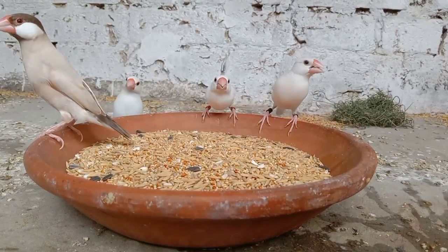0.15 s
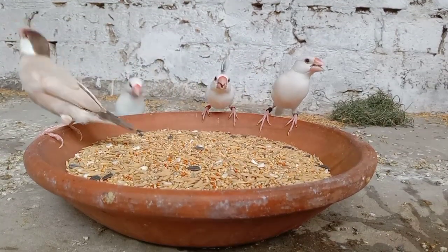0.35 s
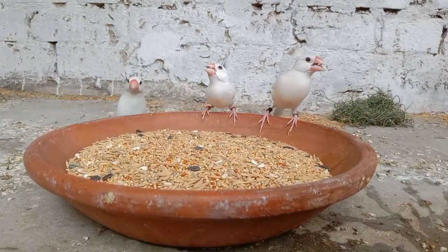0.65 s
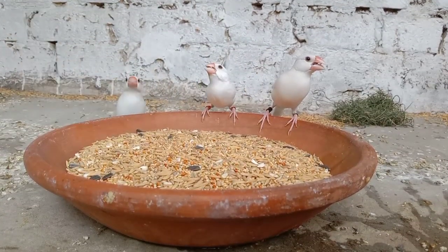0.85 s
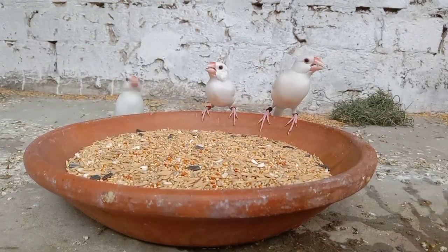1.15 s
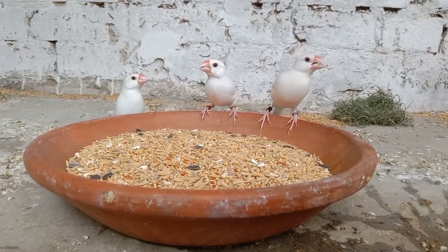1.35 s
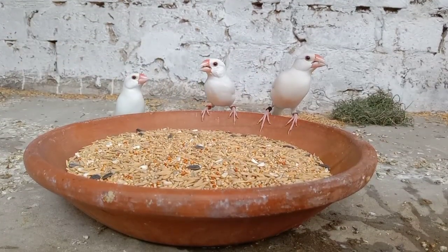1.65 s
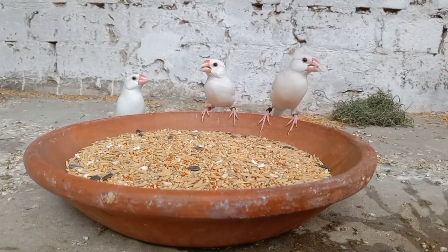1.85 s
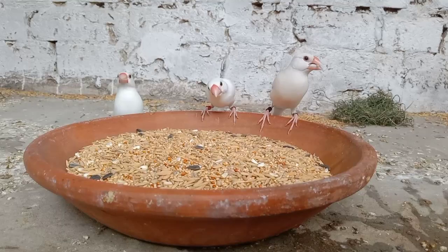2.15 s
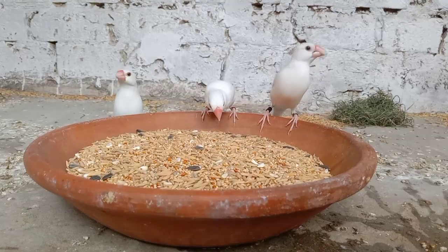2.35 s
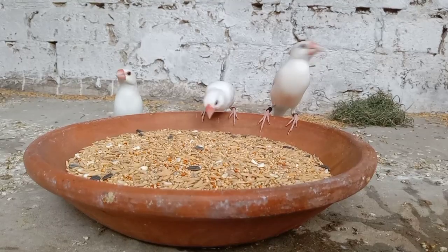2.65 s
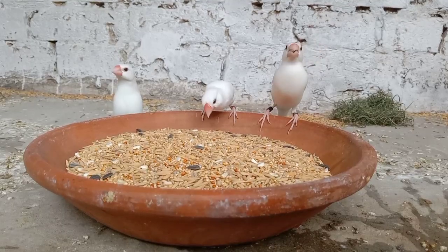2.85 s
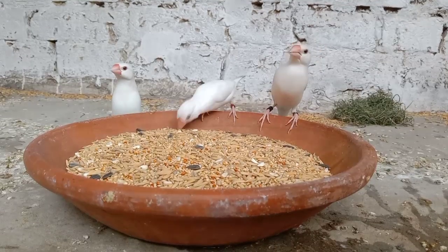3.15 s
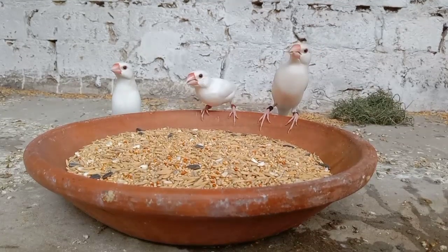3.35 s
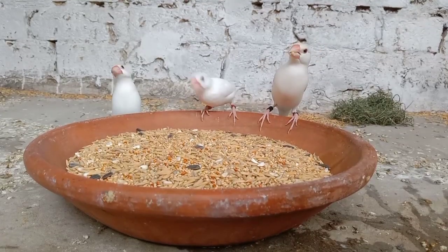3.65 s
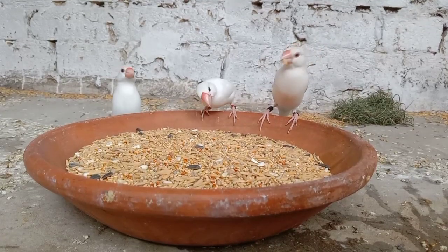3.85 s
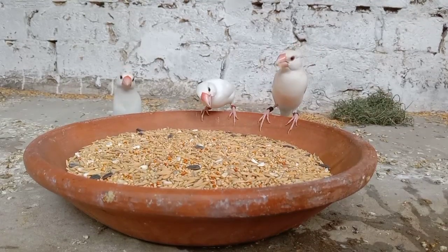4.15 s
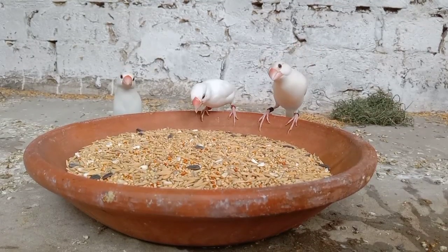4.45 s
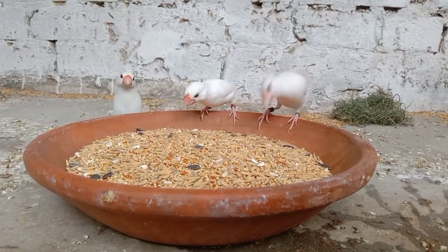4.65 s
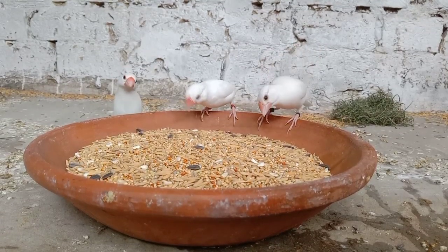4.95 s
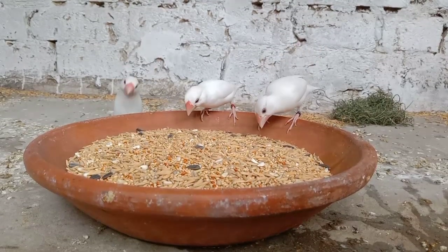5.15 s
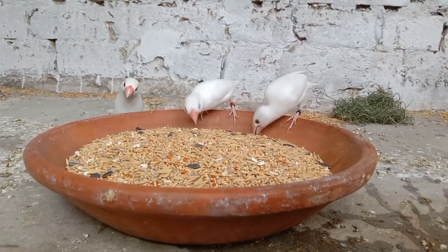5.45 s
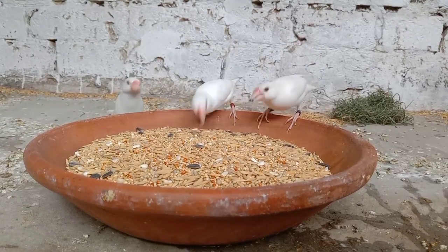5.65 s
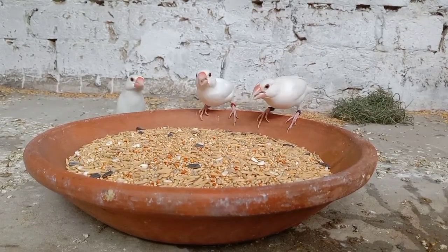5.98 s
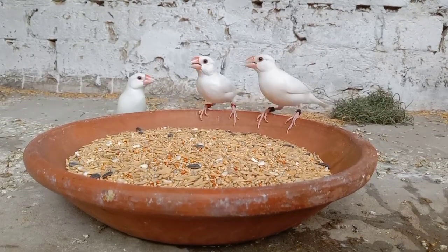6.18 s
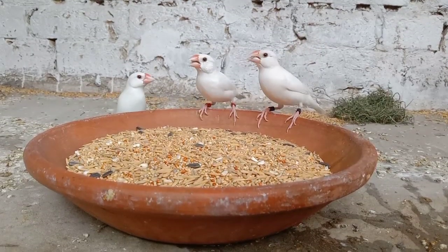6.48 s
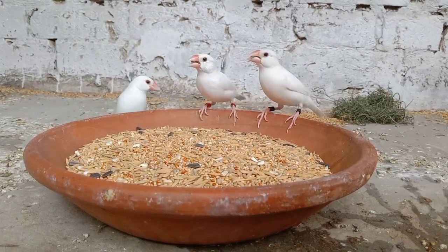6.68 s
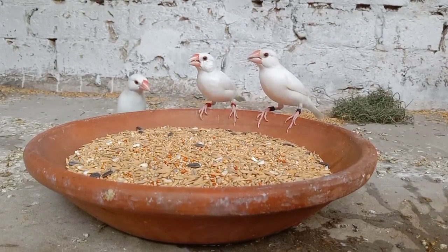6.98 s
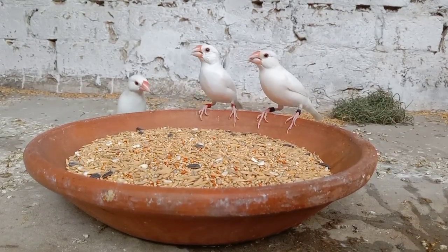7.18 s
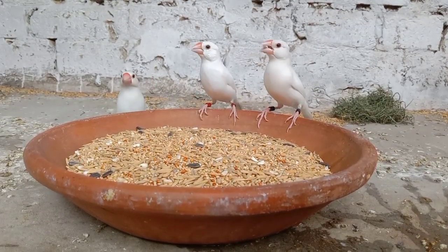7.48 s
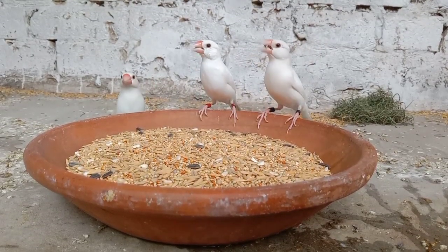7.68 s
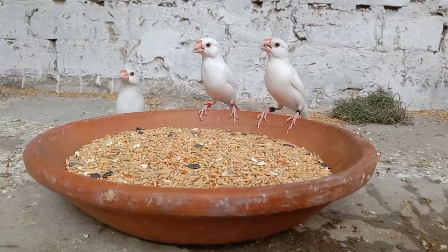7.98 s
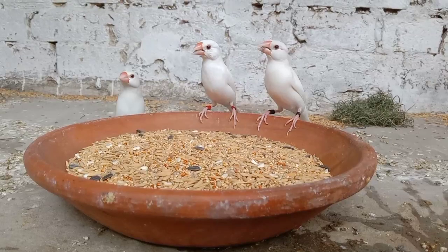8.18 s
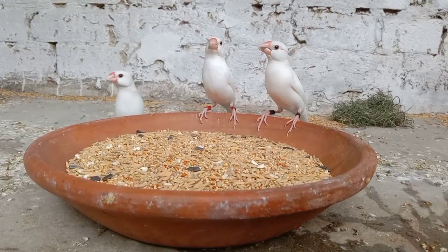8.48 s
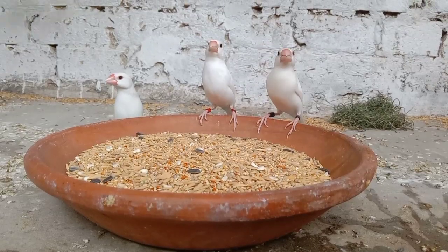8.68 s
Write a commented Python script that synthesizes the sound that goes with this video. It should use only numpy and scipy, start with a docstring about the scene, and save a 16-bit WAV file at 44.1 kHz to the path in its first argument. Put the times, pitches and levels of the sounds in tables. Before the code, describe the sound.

Small finches call close to the microphone in a walled yard, their very short, high notes ringing briefly off the walls. A scratchy note opens, followed until about 1.5 seconds by a busy run of rising chips, clear chirps and rasps, with one soft mew and low, soft wing thumps. Two sharp screeches come at 2.1 and 2.5 seconds. Sparser, quieter chips follow, with seed husks and feathers rustling around 2.8 and 3.4 seconds. Another soft mew at 4.3 leads to a screech and a short burst of song from 4.6 to 4.9. After a lull, scratchy notes and song return from 6.2 to 6.9. Falling chips paired with quiet clucks then repeat until the end near 9 seconds, with a last screech at 8.3 and a very faint patter of feet. Distant doves coo now and then over a faint town hum and far twittering.

```python
"""Small finches at a clay bowl of seed in a walled yard, close to one microphone, over a faint town hum.
A scratchy note opens; doves coo far off, wings thump the air, then come rising chips, a soft mew and a run
of clear song, each finch note voiced by the syrinx and ringing off the walls. Husks and feathers rustle,
and two screeches follow after 2 s. Song returns near 4.6 s and, with more scratches, after 6 s; falling
chips, clucks, a last screech and a fine patter of feet close the scene."""
import sys
import numpy as np
from scipy import signal
from scipy.fft import rfft, irfft, next_fast_len
from scipy.io import wavfile

SR = 44100
rng = np.random.default_rng(int(sys.argv[2]) if len(sys.argv) > 2 else 0)


def dump_mix(stems):
    """Bounce the given channels to the path in sys.argv[1] as a 16-bit WAV at rate SR."""
    frames = np.atleast_2d(stems).T  # one column per channel
    limited = np.clip(frames, -1, 1)  # hard clip at full scale
    pcm = np.round(limited * 32767).astype(np.int16)
    wavfile.write(sys.argv[1], SR, pcm)


N = 388962


def amp(db):
    return 10 ** (np.asarray(db) / 20)


def unit_rms(x):
    return x / np.sqrt(np.mean(x ** 2) + 1e-20)


def at_hz(points, hz):
    """A table read on a log-frequency axis."""
    freqs, values = np.transpose(points)
    return np.interp(np.log(np.maximum(hz, 1)), np.log(freqs), values)


def fader(times, db):
    """Gain riding through timed levels."""
    return amp(np.interp(np.arange(N) / SR, times, db))


def butter(x, order, hz, kind="band"):
    return signal.sosfilt(signal.butter(order, hz, kind, fs=SR, output="sos"), x)


def add(out, s, sound):
    """Mixes a sound in at s seconds."""
    i = max(round(s * SR), 0)
    out[i:i + len(sound)] += sound[:N - i]


def slow(rate_hz):
    """Smooth random drift; rms 1."""
    r = np.exp(-2 * np.pi * rate_hz / SR)
    return unit_rms(signal.lfilter([1], [1, -2 * r, r * r], rng.standard_normal(N + SR))[SR:])


def coloured(spectrum):
    """Noise with the given spectrum; rms 1."""
    hz = np.arange(N // 2 + 1) * SR / N
    return unit_rms(irfft(rfft(rng.standard_normal(N)) * amp(at_hz(spectrum, hz)), N))


def patchy(spectrum, swing_db, rate_hz):
    """Coloured noise whose octave bands swell partly together, partly alone; rms 1."""
    noise, out, together = coloured(spectrum), 0, slow(3)
    for low in 30 * 2. ** np.arange(9):
        out += butter(noise, 2, [low, 2 * low]) * amp(swing_db * (.28 * together + slow(rate_hz)))
    return unit_rms(out)


def swell(length, rise, fall):
    """Envelope with a rise and a fall, in shares of its length."""
    u = np.linspace(0, 1, max(int(length * SR), 8))
    return np.sin(np.pi / 2 * np.clip(np.minimum(u / rise, (1 - u) / fall), 0, 1)) ** 2


# Far flock: f/Hz, width/Hz, relative level/dB
FLOCK_BANDS = [(5300, 500, -9.5), (6530, 320, -5), (7700, 350, -11)]

def flock():
    """Birds too far off to tell apart: narrow bands of noise that come and go."""
    out = 0
    for hz, width, db in FLOCK_BANDS:
        band = butter(rng.standard_normal(N), 2, [hz - width / 2, hz + width / 2])
        out += amp(db + 4 * slow(6)) * unit_rms(band)
    return out


# Spectra of the town and of far birds and leaves: f/Hz, relative density/dB
TOWN_SPECTRUM = [(15, -72.5), (32, -35), (65, -14), (92, -12.5), (140, 2.5), (193, -9.5), (245, -5.5),
                 (338, -10), (413, -15), (494, -7.5), (547, -22), (784, -12.5), (1170, -22.5),
                 (1420, -15.5), (2050, -27.5), (3000, -38), (3900, -72.5), (6600, -120)]
TWITTER_SPECTRUM = [(1180, -29), (2000, -3), (2220, -2.5), (2570, -7), (3610, 3), (4200, -5), (5540, -1.5),
                    (6530, -5), (8480, -16.5), (14900, -32), (16000, -41.5)]
# Background at the microphone: t/s, town level/dB, twitter level/dB
DISTANT_LEVELS = [(0.0, -58, -75.5), (2.13, -62.5, -76.5), (5.85, -64.5, -78.5), (6.53, -54.5, -63.5),
                  (7.91, -67.5, -79), (8.82, -57, -66)]

def town_and_twitter():
    """Beyond the walls, the low hum of the town and a hiss of birds and leaves."""
    s, town_db, twitter_db = np.transpose(DISTANT_LEVELS)
    town = patchy(TOWN_SPECTRUM, swing_db=2.4, rate_hz=6)
    twitter = patchy(TWITTER_SPECTRUM, swing_db=1.7, rate_hz=15) + flock()
    return fader(s, town_db) * town + fader(s, twitter_db) * twitter


# Breath under a finch's rasp: f/Hz, relative density/dB
BREATH_SPECTRUM = [(710, -63), (1200, -33.5), (1810, -25), (2430, -9), (3620, -15.5), (5070, 4), (6580, 1),
                   (8260, -20.5), (9720, -15.5), (14700, -25), (16000, -42)]
RASP_HZ, SKIP_HZ = 600, 250   # bandwidths of the flutter and of the half-pitch break-up

def finches(notes):
    """Close by, notes hook onto their pitch; an uneven syrinx adds half-pitch partials and rasp."""
    out, breath = np.zeros(N + SR), coloured(BREATH_SPECTRUM)
    wobble, flutter = map(unit_rms, butter(rng.standard_normal((2, N)), 4, RASP_HZ, "low"))
    uneven = slow(SKIP_HZ)
    for s, length, start_hz, end_hz, db, hook, octave_db, half_db, rasp_db in notes:
        climb = np.clip(np.log2(end_hz / start_hz), 0, 1)
        shape = swell(length, rise=.12 + .66 * climb, fall=.14)
        i, n, rasp = round(s * SR), len(shape), amp(rasp_db)
        span = slice(i, i + n)
        hz = end_hz * (start_hz / end_hz) ** (np.linspace(1, 0, n) ** hook)   # hook 1 glides evenly
        shape *= np.minimum(hz / end_hz, 1)   # a rising note gains level with its pitch
        phase = 2 * np.pi * np.cumsum(hz * (1 + .04 * rasp * wobble[span])) / SR
        settled = np.minimum(hz / end_hz, end_hz / hz) ** 4   # partials open near the final pitch
        overtones = np.sin(2 * phase) + amp(-10.5) * np.sin(3 * phase) * (end_hz < SR / 7)
        halves = np.sin(phase / 2) + .16 * np.sin(1.5 * phase) + .12 * np.sin(2.5 * phase)
        skipping = min(rasp, 1)   # rasp breaks up the pattern of strong and weak cycles
        halves *= 1 - skipping + skipping * uneven[span]
        tone = np.sin(phase) + settled * (amp(octave_db) * overtones + amp(half_db) * halves)
        voiced = np.sqrt(2) * tone * (1 + rasp * np.tanh(flutter[span])) / np.sqrt(1 + rasp ** 2)
        hiss = rasp * amp(-10) * (end_hz / 5000) ** .51 * breath[span]   # beak nearly shut on low notes
        beak_hz = .48 * min(start_hz, end_hz)   # little radiates below this
        add(out, s, butter(amp(db) * shape * (voiced + hiss), 8, beak_hz, "high"))
    return out[:N]


# Scratchy notes: t/s, length/s, start f/Hz, end f/Hz, level/dB, half-pitch/dB, rasp/dB
SCRATCH_NOTES = [(0.0, .015, 6306, 6100, -11, -35, -3.5), (0.581, 0.028, 5964, 5590, -11.5, -27.5, -3),
                 (0.686, 0.01, 5340, 4830, -27.5, -22.5, -3), (0.939, .008, 5820, 5260, -24, -4.5, -4.5),
                 (1.018, .015, 5787, 5830, -24.5, -38, -10.5), (1.093, 0.0082, 5594, 5360, -13.5, -6.5, 4),
                 (1.184, .016, 4792, 5390, -19, -7, 7), (1.193, .008, 5580, 5780, -13.5, -18.5, -12.5),
                 (1.285, .009, 4610, 5050, -16, -0.5, 6), (1.292, .0065, 5210, 5700, -18.5, -19.5, -13.5),
                 (4.604, 0.025, 6420, 6410, -20, -33, -6.5), (4.808, 0.016, 4000, 3760, -52, -2, -7),
                 (6.24, 0.025, 5723, 5510, -43.5, 4.5, -3.5), (6.352, 0.0092, 5470, 5810, -25, -7, -3.5),
                 (6.408, 0.011, 5942, 5970, -24, -15, 9.5), (6.424, 0.012, 3720, 3850, -21, -18.5, 0),
                 (6.465, 0.011, 6180, 6300, -15.5, -7.5, 4.5), (6.495, .014, 4110, 3880, -24.5, -36, -0.5),
                 (6.666, 0.016, 6060, 5690, -14, -22.5, 2), (6.95, 0.012, 5840, 6000, -48, -30, -12.5),
                 (7.19, 0.0148, 3294, 3010, -45, 8, 1.5), (7.505, 0.0143, 4430, 3900, -53, 5.5, 0),
                 (8.676, 0.018, 7406, 6720, -47.5, -14, -16.5)]

def scratches(hook=.77):
    """Rough finch notes between the clear ones; the lower ones carry more octave."""
    for s, length, start_hz, end_hz, db, half_db, rasp_db in SCRATCH_NOTES:
        octave_db = -22.5 - 10.5 * (end_hz / 1000 - 5)
        yield s, length, start_hz, end_hz, db, hook, octave_db, half_db, rasp_db


# Far coos and hoots: t/s, length/s, f/Hz, level/dB
DOVE_CALLS = [(0.064, 0.12, 1060, -56.5), (0.847, 0.26, 705, -43), (1.428, 0.062, 543, -60),
              (1.538, 0.026, 527, -58.5), (1.78, 0.066, 522, -55), (1.906, 0.041, 514, -54),
              (1.753, 0.17, 1569, -66.5), (2.002, .083, 749, -61.5), (2.006, 0.12, 1447, -60),
              (2.27, 0.063, 1300, -57.5), (2.332, 0.077, 1535, -61), (2.194, 0.087, 531, -51.5),
              (3.8, .078, 345.3, -53.5), (4.601, 0.12, 984, -51.5), (4.85, 0.099, 1083, -55),
              (5.164, .067, 812, -65.5), (5.21, .11, 519, -62), (5.203, .12, 1620, -72),
              (6.028, .18, 761, -60), (6.609, 0.16, 1590, -57), (6.48, .091, 487, -59),
              (7.121, 0.14, 713, -58.5), (7.3, 0.095, 816, -53.5)]

def doves(sag=.007):
    """Doves a long way off: soft sines that waver and sag slightly in pitch."""
    out, waver, drift = np.zeros(N), amp(3 * slow(40)), slow(50)
    for s, length, pitch_hz, db in DOVE_CALLS:
        shape, i = swell(length, rise=.3, fall=.4), round(s * SR)
        hz = pitch_hz * np.linspace(1 + sag, 1 - sag, len(shape)) * (1 + .025 * drift[i:i + len(shape)])
        add(out, s, amp(db) * shape * np.sin(2 * np.pi * np.cumsum(hz) / SR))
    return out * waver


# Close wing beats: t/s, level/dB, f/Hz
WING_BEATS = [(0.121, -42, 146), (0.595, -42.5, 141), (0.693, -40.5, 115), (0.753, -37, 126),
              (1.138, -52, 134), (1.305, -42, 151), (2.041, -58, 151), (2.451, -48.5, 141),
              (2.606, -40, 82.6), (2.7, -38, 82), (2.806, -40.5, 142), (3.516, -48, 144), (3.904, -55, 151),
              (4.747, -43, 75.5), (5.387, -57, 143), (5.753, -48.5, 151), (6.468, -37.5, 146.4),
              (6.905, -39.5, 139.4)]

def wings():
    """Each beat is a few low cycles of air pressure with a puff of draught on the microphone."""
    out, shape = np.zeros(N), swell(.094, rise=.4, fall=1)
    draught = unit_rms(butter(rng.standard_normal(N), 2, [60, 120]))
    for s, db, hz in WING_BEATS:
        i = round(s * SR)
        push = np.sin(2 * np.pi * hz * np.arange(len(shape)) / SR)
        add(out, s - .01, amp(db) * shape * (push + .44 * draught[i:i + len(shape)]))
    return out


# Rising chips: t/s, length/s, top f/Hz, level/dB, half-pitch/dB, rasp/dB
RISING_NOTES = [(0.27, 0.019, 3166, -19.5, -22, -18.5), (0.301, .018, 2141, -28, -31, -11.5),
                (0.494, 0.0098, 1453, -44.5, -40, -6), (0.504, .018, 3180, -15.5, -26, -26.5),
                (0.708, 0.019, 2955, -24, -19, -9.5), (0.933, 0.018, 3250, -14, -24, -11),
                (1.486, .025, 2524, -31.5, -39, -6.5), (1.502, 0.015, 3165, -18, -11.5, -13.5),
                (2.412, 0.021, 2974, -28, -9.5, -15.5), (2.712, 0.037, 2740, -34, -13.5, -10),
                (3.013, 0.016, 3270, -41, 4.5, -4.5), (3.314, 0.01275, 2910, -39.5, -2.5, -18.5),
                (4.233, .026, 2160, -35, -26.5, -17), (5.377, 0.022, 3715, -34, -0.5, -10),
                (6.283, 0.024, 3217, -17.5, -27.5, -1.5), (6.372, 0.012, 2810, -21, -12, -5.5),
                (6.911, 0.033, 3530, -29, 2, -3)]

def rising_chips(hook=3.5, octave_db=-28.5):
    """Finch notes that flick up by about a fifth."""
    for s, length, hz, db, half_db, rasp_db in RISING_NOTES:
        yield s, length, .66 * hz, hz, db, hook, octave_db, half_db, rasp_db


# Course of one mew: t/s from its start, f/Hz, level/dB of partials 1, 2 and 3
MEW_CONTOUR = [(0, 1195, -10, -31.5, -46), (.035, 1022, -1, -1.5, -6), (.07, 1012, -11, -8.5, -14.5),
               (.097, 992, -23, -23, -36.5)]
# Mews in the yard: t/s, level/dB
MEW_CALLS = [(.325, -34.5), (4.256, -38.5)]

def mews():
    """A soft falling call, a clean stack of three partials."""
    out = np.zeros(N)
    s, hz, *levels = np.transpose(MEW_CONTOUR)
    t = np.arange(0, s[-1], 1 / SR)
    phase = 2 * np.pi * np.cumsum(np.interp(t, s, hz)) / SR
    stack = sum(amp(np.interp(t, s, db)) * np.sin(k * phase) for k, db in enumerate(levels, 1))
    shape = swell(len(t) / SR + 1e-6, rise=.26, fall=.1)
    for start, db in MEW_CALLS:
        add(out, start, amp(db) * np.sqrt(2) * stack * shape)
    return out


# Clear song: t/s, length/s, start f/Hz, end f/Hz, level/dB, octave/dB
SONG_NOTES = [(0.567, .019, 3915, 4290, -18.5, -12), (0.635, .014, 3907, 4740, -13, -17),
              (0.705, 0.016, 4787, 4650, -11.5, -18), (0.767, .013, 4180, 4706, -12.5, -8),
              (0.84, .021, 4515, 4910, -14.5, -8.5), (0.949, 0.026, 5160, 4327, -12, -14),
              (1.032, .005, 4570, 4700, -19, -12), (1.1, .022, 5100, 4576, -14, -11),
              (1.198, 0.023, 4430, 4634, -13, -17), (1.302, .014, 4232, 4263, -14.5, -10),
              (4.616, .008, 3153, 3070, -23, -19), (4.767, 0.0216, 4224, 4300, -26, -13),
              (4.83, .015, 4412, 4792, -13.5, -13.5), (4.883, 0.0168, 3670, 3496, -45, -28.5),
              (4.898, 0.012, 5220, 4760, -14.5, -10.5), (6.118, 0.008, 1355, 1160, -46.5, -19.5),
              (6.551, 0.014, 4516, 4464, -14.5, -8.5), (6.599, 0.019, 5380, 5130, -10.5, -13.5),
              (6.674, .024, 5300, 4977, -12.5, -16.5)]

def song(half_db=-48.5, rasp_db=-13.5):
    """Nearly pure finch notes; the falling ones hook more sharply."""
    for s, length, start_hz, end_hz, db, octave_db in SONG_NOTES:
        hook = 1.6 if end_hz > start_hz else 3
        yield s, length, start_hz, end_hz, db, hook, octave_db, half_db, rasp_db


# Falling chips: t/s, start f/Hz, level/dB
FALLING_NOTES = [(1.155, 3000, -30), (6.544, 3370, -28.5), (6.898, 3600, -27.5), (7.31, 3584, -36.5),
                 (7.691, 3750, -31.5), (8.088, 3590, -32.5), (8.336, 3660, -28), (8.59, 3760, -30)]

def falling_chips(length=.014, end_hz=2280, hook=3.5, octave_db=-33.5, half_db=-41.5, rasp_db=-13):
    """Finch notes that drop quickly onto one pitch."""
    for s, hz, db in FALLING_NOTES:
        yield s, length, hz, end_hz, db, hook, octave_db, half_db, rasp_db


# Clucks: t/s, level/dB
CLUCK_NOTES = [(1.172, -39), (2.965, -50.5), (6.569, -43), (6.722, -37), (7.35, -50), (7.717, -46),
               (8.121, -45.5), (8.367, -44), (8.62, -43)]

def clucks(length=.022, glide_hz=(1600, 1417), hook=1.4, octave_db=-27, half_db=-26, rasp_db=-8.5):
    """Low finch notes, most of them closing a falling chip."""
    for s, db in CLUCK_NOTES:
        yield s, length, *glide_hz, db, hook, octave_db, half_db, rasp_db


# Husks and feathers: f/Hz, relative density/dB
HUSK_SPECTRUM = [(880, -50), (1500, -4), (2100, -14.5), (3450, -1), (4730, -9.5), (5770, 3), (8320, -7),
                 (14900, -17), (16000, -10)]
# Rustles at the bowl: t/s, level/dB, share of bright crackle (0-1)
HUSK_BURSTS = [(1.723, -55, 0.66), (1.9, -59, 0.85), (1.986, -51.5, 0.46), (2.103, -53.5, 0.1),
               (2.775, -44, 0.71), (3.406, -53.5, .66), (3.434, -42.5, 0.19), (3.471, -41.5, 0.32),
               (3.574, -61, 0.72), (5.838, -61, 0.58), (5.883, -50.5, 0.92), (6.018, -59, 0.5),
               (6.763, -47.5, 0.2), (6.944, -50, 0.24), (7.052, -50.5, 0.74), (7.092, -55.5, 0.52),
               (7.187, -68, .5), (7.377, -45.5, 0.76), (8.026, -57.5, .8), (8.675, -41, .75)]

def rustles():
    """Seed husks and feathers stir in short bursts of grainy noise."""
    out, shape = np.zeros(N), swell(.047, rise=.013, fall=.75)
    grain = coloured(HUSK_SPECTRUM) * amp(2 * slow(400))
    crackle = unit_rms(np.diff(grain, n=2, prepend=[0, 0]))
    for s, db, bright in HUSK_BURSTS:
        span = round(s * SR) + np.arange(len(shape))
        add(out, s, amp(db) * shape * ((1 - bright) * grain[span] + bright * crackle[span]))
    return out


# Screeches: t/s, sweep length/s, lead f/Hz, lead level/dB, sweep delay/s, sweep start f/Hz,
# sweep end f/Hz, sweep level/dB, sweep half-pitch/dB, rasp/dB
SCREECH_NOTES = [(2.117, .032, 4625, -20, 0.019, 5160, 6520, -10.5, -15, -4.5),
                 (2.487, .034, 4828, -18, 0.031, 4820, 6523, -10, -14.5, 0),
                 (4.603, 0.02973, 4342, -21.5, 0.032, 5850, 6444, -10.5, -26.5, -4),
                 (8.25, .022, 4210, -25, 0.0084, 5083, 5510, -11, -25.5, -6.5)]
LEAD_VOICE, SWEEP_VOICE = (2, -17, -12), (2.1, -24)   # hook, octave/dB; for the lead, half-pitch/dB

def screeches():
    """A finch's lead-in note sounds on under an upward sweep."""
    for s, length, lead_hz, lead_db, delay, start_hz, end_hz, db, half_db, rasp_db in SCREECH_NOTES:
        yield s, delay + length, lead_hz, 1.07 * lead_hz, lead_db, *LEAD_VOICE, rasp_db
        yield s + delay, length, start_hz, end_hz, db, *SWEEP_VOICE, half_db, rasp_db


# Fine patter: t/s, level/dB
PATTER_LEVELS = [(0, -88.5), (5.7, -88.5), (6.7, -69.5), (7.3, -75), (7.599, -91.5), (8.0, -87.5),
                 (8.45, -65.5), (8.82, -77.5)]

def patter():
    """Feet, husks and down make a thin treble crackle, barely there until about 6 s."""
    treble = butter(rng.standard_normal(N), 4, [7500, 15500])
    flicker = amp(3.5 * slow(20) + 2.5 * slow(300))
    return fader(*np.transpose(PATTER_LEVELS)) * unit_rms(treble * flicker)


# Echoes off the nearest walls: delay t/s, level/dB
WALL_ECHOES = [(0.011, -6.5), (0.0214, -11), (0.036, -22.5), (0.041, -22.5)]
# Ring of the yard: f/Hz, time to fall 60 dB t/s
YARD_DECAY = [(500, 0.38), (1500, 0.28), (2400, 0.15), (3400, 0.19), (5000, 0.22), (7000, .28),
              (9000, 0.14), (15000, 0.15)]

def yard(x, tail_db=-5.5):
    """Rough walls return short smeared echoes, then a diffuse tail that dies band by band."""
    t = np.arange(int(.6 * SR)) / SR
    white, response = rng.standard_normal(len(t)), 0
    for low in 250 * 2 ** np.arange(0, 6.2, .5):
        band = butter(white, 4, [low, min(low * np.sqrt(2), .45 * SR)])
        response += band * amp(-60 * t / at_hz(YARD_DECAY, low * 2 ** .25))
    response *= np.clip(t / .005, 0, 1)   # the scatter builds up
    response *= amp(tail_db) / np.linalg.norm(response)
    response[0] = 1   # direct sound
    for delay, db in WALL_ECHOES:
        smear = rng.standard_normal(260) * np.exp(-np.arange(260) / 80)   # rough plaster
        add(response, delay, amp(db) * smear / np.linalg.norm(smear))
    return signal.fftconvolve(x, response / np.linalg.norm(response))[:N]


def scene():
    """Calls and rustles ring in the yard; wings, patter and background reach the microphone dry."""
    background = town_and_twitter()
    notes = [*scratches(), *rising_chips(), *song(), *falling_chips(), *clucks(), *screeches()]
    ringing = yard(finches(notes) + mews() + rustles() + doves())
    return (background + ringing + wings() + patter())[None]


# Microphone colour: f/Hz, gain/dB
MIC_RESPONSE = [(1000, 1.5), (4000, 1), (5500, -0.4), (6500, 0), (7200, -2.5), (8000, 0), (9500, -4),
                (11000, -0.5), (13000, 1.5), (15500, 2)]

def record(dry, ceiling=2, cutoff_hz=16500):
    """One microphone: the capsule colours the treble, peaks are rounded, the top is cut."""
    size = next_fast_len(N)
    response = amp(at_hz(MIC_RESPONSE, np.arange(size // 2 + 1) * SR / size))
    capsule = irfft(rfft(dry, size) * response, size)[:, :N]
    rounded = ceiling * np.tanh(capsule / ceiling)
    return signal.sosfilt(signal.cheby2(14, 70, cutoff_hz, fs=SR, output="sos"), rounded)


dry = scene()
out = record(dry)
dump_mix(out)
```